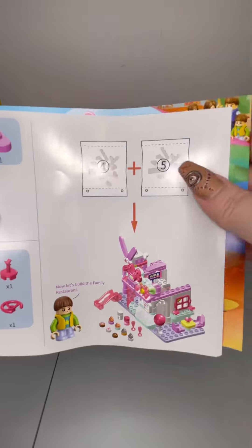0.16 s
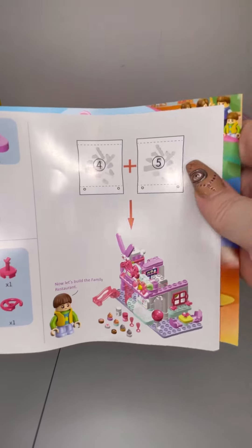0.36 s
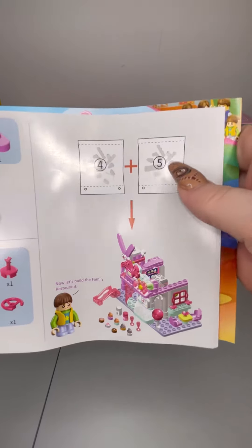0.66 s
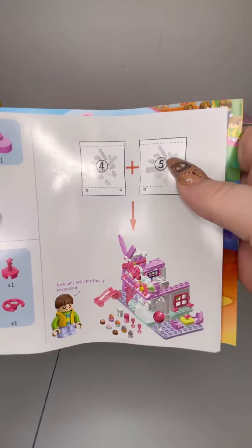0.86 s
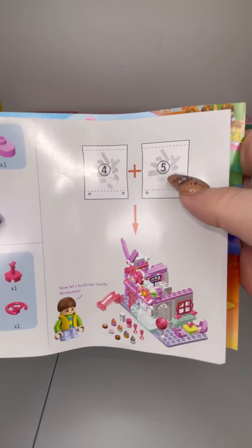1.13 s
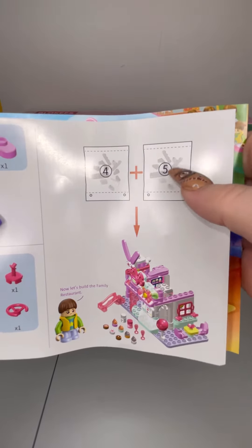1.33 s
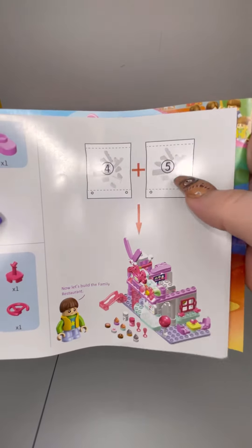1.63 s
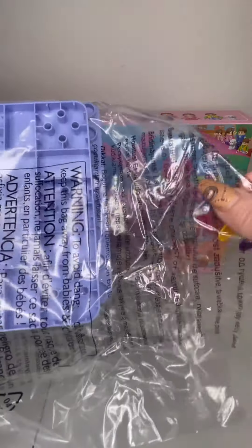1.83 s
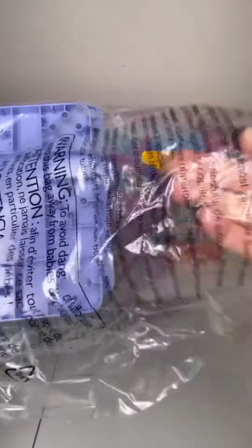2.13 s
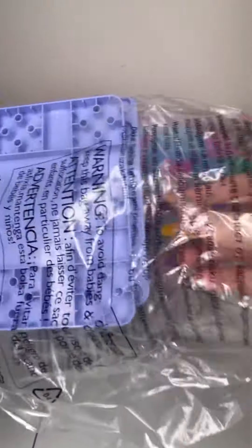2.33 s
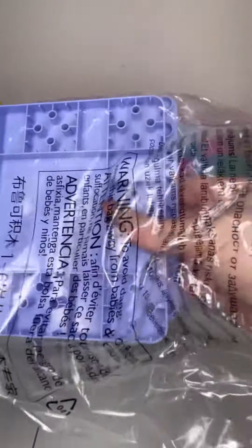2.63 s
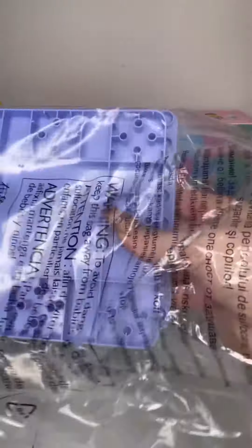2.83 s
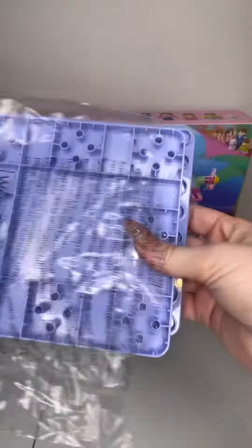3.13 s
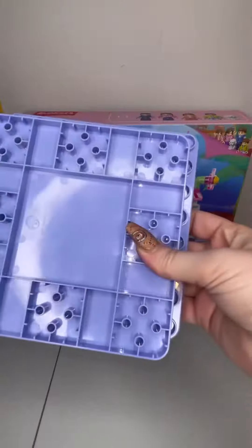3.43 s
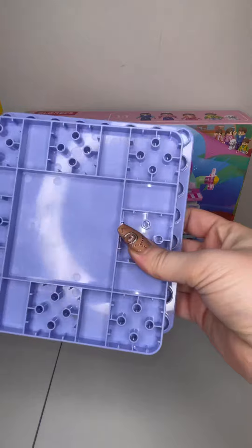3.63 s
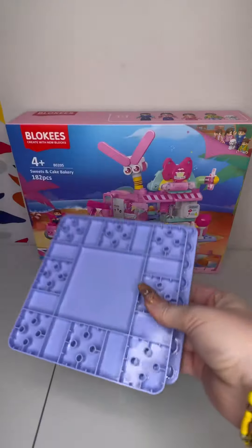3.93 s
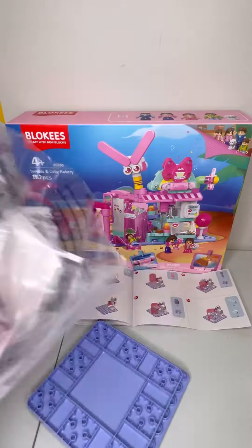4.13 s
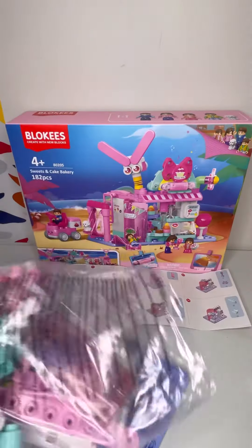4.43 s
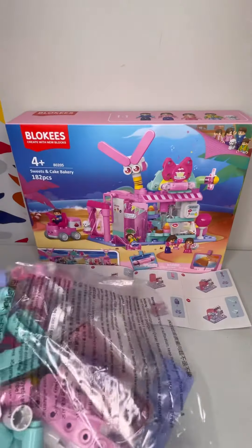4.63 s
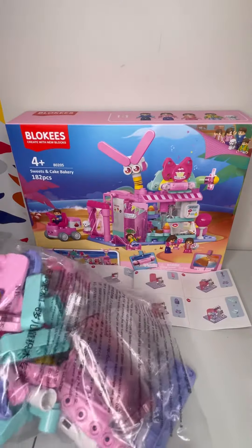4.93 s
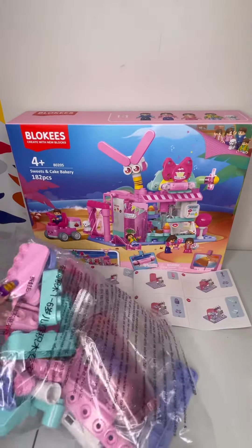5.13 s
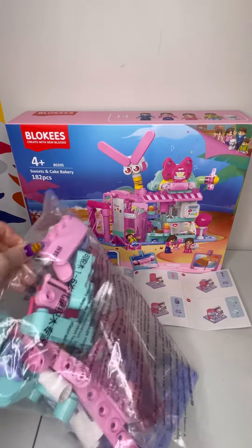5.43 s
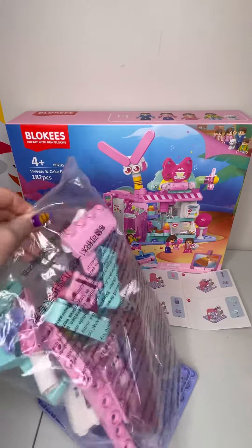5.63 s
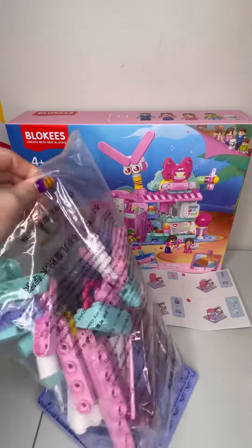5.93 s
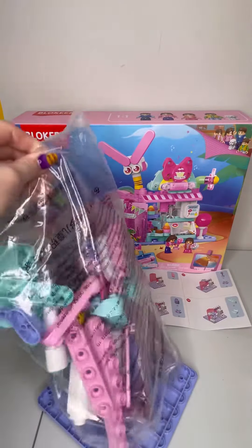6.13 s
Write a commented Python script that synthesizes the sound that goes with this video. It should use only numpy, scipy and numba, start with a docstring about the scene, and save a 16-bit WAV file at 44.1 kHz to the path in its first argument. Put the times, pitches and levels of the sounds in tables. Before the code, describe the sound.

Dry nail ticks on paper give way to crackling plastic film, near quiet, then a loud burst of toy blocks knocking inside a crinkly bag.

```python
"""A small room, close to a phone on a table: a fingernail taps a booklet, a plastic base plate is drawn out of its
crinkling bag, then a bag full of plastic building blocks is lifted and they clatter. Taps, folds, blocks and
table top are struck modes that ring and decay; sliding film, page swishes, bumps and the low hum of the room
are shaped noise. The walls answer everything near with a diffuse tail."""
import sys
import numpy as np
from scipy import signal
from scipy.fft import rfft, irfft
from scipy.io import wavfile
from scipy.ndimage import uniform_filter1d
from numba import njit

SR = 44100
rng = np.random.default_rng(int(sys.argv[2]) if len(sys.argv) > 2 else 0)


def makeup_ratio(level_db):
    """Linear amplitude ratio for a level in decibels (20 dB per factor of ten)."""
    decades = np.asarray(level_db, float) / 20
    return 10 ** decades


def transcribe(u):
    """Save the signal u as a 16-bit wav file named by the first command-line argument.

    u: samples, shape (n,) or (channels, n), limited to [-1, 1]; the rate is SR.
    q: integer samples, one column per channel.
    """
    v = np.clip(np.atleast_2d(u).T, -1, 1)
    q = np.round(v * 32767).astype(np.int16)
    wavfile.write(sys.argv[1], SR, q)


N = 276948  # length in samples

# Nail on booklet. Each row: start in seconds, level in dB.
TAP_TIMES = [(0.439, -48), (0.49, -52), (0.726, -47), (0.921, -40.5), (1.097, -40), (1.261, -41.5),
             (1.402, -40.5), (1.563, -34.5), (1.684, -51.5)]
# Crunches of film and blocks. Each row: start in seconds, level in dB for a short crunch, extra below 2500 Hz in dB,
# extra above 8000 Hz in dB, length in ms.
CRUNCHES = [(1.788, -47.5, 4.5, 0, 17.5), (1.811, -36.5, 2, 14.5, 4.1), (1.83, -35.5, -14.5, 9.5, 3.4),
            (1.891, -42.5, 8, -18, 5.8), (1.946, -38.5, 0, -16, 8.4), (1.97, -35.5, -21, 1, 7),
            (1.988, -33, -4, -4, 10.3), (2.026, -27, -14.5, 2.5, 5.4), (2.052, -41.5, 6, 23, 4.1),
            (2.109, -33, 0.5, 8, 13), (2.123, -31, -4.5, 8.5, 7.7), (2.226, -47.5, 9.5, 15.5, 10.7),
            (2.335, -43.5, 4.5, 11.5, 6.3), (2.442, -42, 9.5, -31.5, 5.2), (2.478, -25, -3.5, 7.5, 6.4),
            (2.51, -40.5, -18.5, 7.5, 25), (2.536, -28, -2, 4.5, 5.1), (2.633, -27, -6, 10, 5.5),
            (2.657, -28.5, -5.5, -3.5, 6.5), (2.716, -27, -5, -12, 7), (2.761, -30, -28, 6.5, 4.75),
            (2.811, -32, -4, 6, 8.5), (2.823, -23, -6.5, -3, 6.2), (2.842, -30, 0, 8, 8.6),
            (2.882, -36.5, 7, 1, 8.5), (2.99, -33.5, -13, 8, 6.3), (3.007, -34.5, -3, -18, 6.6),
            (3.045, -40, -12, -2.7, 9.4), (3.158, -29.5, -8, 0.5, 3.6), (3.244, -43, 5.5, 9.5, 7.4),
            (3.344, -40.5, 4, 13, 5.2), (3.399, -33.5, -6, -14, 7), (3.439, -31, -36, 3, 4.66),
            (3.792, -39.5, -7.5, 0, 4), (3.9985, -60, -5, -6, 2), (4.022, -54, 4.5, -20, 3),
            (4.09, -38.5, -0.5, 5.5, 6.2), (4.129, -42.5, 1.5, 17, 6.7), (4.194, -41, -1, -5.5, 6),
            (4.216, -27.5, -6, 3.5, 11.3), (4.267, -32.5, 1, 8, 6.9), (4.29, -25.5, -4.5, 1.5, 6),
            (4.372, -20, -7.5, 10.5, 5.9), (4.376, -15, -12.5, 4, 6.7), (4.384, -16.5, -36.5, -10, 5.2),
            (4.679, -39.5, -2, -3, 15.1), (4.741, -38, -8, 8.5, 7.6), (4.788, -31.5, -11.5, 5.5, 5.3),
            (4.813, -41.5, 0, 10.5, 8.5), (4.866, -41.5, 7.5, 15, 16.3), (4.989, -35.5, -6, 6, 13.3),
            (5.039, -35, -15, 8, 16), (5.137, -31.5, -10, 2.5, 8.8), (5.191, -33, -9.5, 10, 3.5),
            (5.252, -33, -20, 16, 2.7), (5.481, -24, -9, 6, 7.7), (5.557, -38, -10, -13, 21),
            (5.696, -31, -6, 4, 23.6), (5.717, -32.5, -3, -6, 36), (5.773, -29, -9, 0.5, 21),
            (5.807, -21.5, -18, 1.5, 16.8), (6.029, -31.5, -8, 1, 12), (6.12, -31.5, -6.5, -15, 26),
            (6.248, -28.5, -15, 4, 11)]
# Colour of the plastic film. Each row: frequency in Hz, relative level in dB.
FILM_COLOUR = [(300, -24.5), (600, -8.5), (920, -11), (1250, 0.5), (1700, -3), (2500, -2.5), (5000, 2),
               (7500, -5), (10000, -2.5), (11500, 5), (12500, -38)]
# Phase scatter between the two microphone ports. Each row: frequency in Hz, scatter in radians.
PORT_SCATTER = [(60, 0.47), (250, 0.96), (700, 3.2), (1300, 1.96), (3000, 4.46), (6500, 0.73),
                (8500, 0.076), (13000, 0.11)]


def curve(rows):
    """Columns of a table, joined by straight lines in time."""
    s, *columns = np.transpose(rows)
    return [np.interp(np.arange(N) / SR, s, c) for c in columns]


def spectrum(points, hz):
    """Straight lines between points on a log-frequency axis."""
    at, value = np.transpose(points)
    return np.interp(np.log(np.maximum(hz, 1)), np.log(at), value)


def split(x, order, hz):
    """The parts below and above a frequency, without delay; they add up to the whole."""
    below = signal.sosfiltfilt(signal.butter(order, hz, fs=SR, output="sos"), x)
    return below, x - below


def noise(points, size=N):
    """Stereo noise of rms 1; the ports agree as far as their phase scatter allows."""
    hz = np.fft.rfftfreq(size, 1 / SR)
    alike = np.exp(-spectrum(PORT_SCATTER, hz) ** 2 / 2)
    mid, side = rfft(rng.standard_normal((2, size))) * makeup_ratio(spectrum(points, hz))
    opposed = side * np.array([[1], [-1]])
    x = irfft(np.sqrt(1 + alike) * mid + np.sqrt(1 - alike) * opposed, size)
    return x / np.sqrt(np.mean(x ** 2))


def walk(rate):
    """Random levels held 1 / rate s and slewed twice; spread near 1."""
    k = int(SR / rate)
    held = np.repeat(rng.standard_normal(N // k + 1), k)
    return 1.3 * uniform_filter1d(uniform_filter1d(held, k), k)[:N]


@njit
def rings(start, pole, left, right, size):
    """Each ring is a decaying sine that runs until it is 50 dB down."""
    out = np.zeros((2, size))
    for k in range(len(start)):
        z = 1 + 0j
        for i in range(start[k], size):
            out[0, i] += (left[k] * z).imag
            out[1, i] += (right[k] * z).imag
            z *= pole[k]
            if abs(z.real) + abs(z.imag) < .003:
                break
    return out


def strike(s, hz, db, t60, chance):
    """Struck modes ring and decay; each reaches the two ports with its own phase."""
    decay = np.log(1000) / (np.maximum(t60, 1e-3) * SR)
    pole = np.exp(2j * np.pi * np.minimum(hz, .45 * SR) / SR - decay)
    turn = np.exp(.5j * spectrum(PORT_SCATTER, hz) * chance)
    start = (s * SR + 0 * hz).astype(np.int64)
    left, right = makeup_ratio(db) * turn, makeup_ratio(db) / turn
    return rings(start.ravel(), pole.ravel(), left.ravel(), right.ravel(), N)


def blows(s, db, modes, spread=1, late=0):
    """Blows on one body: the same modes, a little different each time; slow modes may set in late (cycles)."""
    hz, mode_db, t60 = np.transpose(modes)
    chance = rng.standard_normal((len(s), 3, len(modes)))
    db = db + mode_db + 1.5 * chance[:, 1]
    return strike(s + late / hz, hz * (1 + 0.015 * chance[:, 0]), db, t60 + 0 * s, spread * chance[:, 2])


def crack(s, db, body_db, edge_db, length_s, count, uneven_db=1.5, hump_db=2.5):
    """A buckling fold of film or a knock: a run of short rings over the whole range, thinning out with time."""
    rise_s = .0014  # a fold takes this long to give way
    place, chance = rng.random((len(s), 2, count)), rng.standard_normal((len(s), 2, count))
    hz = 290 * 50 ** ((np.arange(count) + place[:, 0]) / count)
    tilt_db = np.where(hz < 2500, body_db, np.where(hz > 8000, edge_db, 0))
    colour_db = spectrum(FILM_COLOUR, hz) + tilt_db
    # every fold favours its own part of the range
    colour_db = colour_db + hump_db * np.cos(2 * np.log(hz) + 2 * np.pi * rng.random((len(s), 1)))
    # small stiff areas of plastic die within a few cycles
    t60 = 5.5 / hz + .002
    # short cracks give most at once, long crunches stay even
    delay = length_s * place[:, 1] ** (1 + .016 / length_s)
    delay = delay + rise_s * place[:, 0]
    colour_db = colour_db + 10 * np.log10(1 - np.exp(-delay / rise_s))
    return strike(s + delay, hz, db + colour_db + uneven_db * chance[:, 0], t60, chance[:, 1])


def room_tone():
    """The room hums low: steady noise, strongest near 61 Hz, its level wandering a little."""
    # Colour of the hum. Each row: frequency in Hz, relative level in dB.
    hum_colour = [(25, -1.5), (40, 2.5), (61, 11.5), (85, 2), (118, 0), (160, -12), (250, -33),
                  (315, -15.5), (420, -33.5), (700, -22), (1050, -41.5), (1700, -27), (5000, -62),
                  (13000, -57)]
    return makeup_ratio(-54.5 + 1.7 * walk(5.5)) * noise(hum_colour)


def room(x):
    """Diffuse answer of the walls: it builds up as the reflections arrive, then dies away, the treble sooner."""
    t60_s, treble_t60_s, rise_s, level_db = 0.27, 0.31, 0.0054, -6.5
    size = SR // 2
    t = np.arange(size) / SR
    dull, bright = split(noise([(100, 11.0), (1000, 3.9), (13000, 1.1)], size=size), 2, 6000)
    # the treble decays by both rates together
    tail = (dull + bright * makeup_ratio(-60 * t / treble_t60_s)) * makeup_ratio(-60 * t / t60_s)
    tail = tail * (1 - np.exp(-(t / rise_s) ** 2))
    tail = tail / np.sqrt(np.sum(tail ** 2) / 2)
    return makeup_ratio(level_db) * signal.fftconvolve(x.mean(axis=0)[None], tail, axes=1)[:, :N]


def bumping():
    """Hands and bag knock the table and push air at the ports: low noise that swells and fades."""
    # Low bumping. Each row: time in seconds, level in dB around which it wanders.
    bump_levels = [(0.0, -69.5), (1.764, -71), (1.79, -51), (2.13, -43.5), (2.29, -55), (2.45, -45),
                   (3.77, -72.5), (4.5, -39), (4.63, -53), (6.28, -45.5)]
    # Its colour. Each row: frequency in Hz, relative level in dB.
    bump_colour = [(25, -31), (60, 2.5), (130, 1.5), (250, -1.5), (500, -17), (900, -48.5)]
    return makeup_ratio(curve(bump_levels)[0] + 2.4 * walk(30)) * noise(bump_colour)


def thuds():
    """The table top rings low under heavier blows and, more softly, under each tap."""
    # Blows on the table top. Each row: start in seconds, level in dB.
    table_blows = [(1.807, -36), (1.997, -32), (2.111, -31.5), (2.469, -29), (2.875, -36.5), (4.437, -20.5),
                   (4.495, -28.5), (4.559, -32)]
    # Modes of the table top. Each row: frequency in Hz, relative level in dB, decay by 60 dB in seconds.
    table_modes = [(63.5, -1.5, 0.18), (133.3, -1.5, 0.18), (232, -5.5, 0.037)]
    heavy = blows(*np.transpose(table_blows)[:, :, None], table_modes, late=0.75)
    tap_s, tap_db = np.transpose(TAP_TIMES)[:, :, None]
    return heavy + blows(tap_s, tap_db - 6, table_modes[1:])  # taps leave out the lowest mode


def brushes():
    """A thumb brushes over the page: soft swishes of noise that swell and fade smoothly."""
    # Swishes. Each row: start in seconds, length in seconds, peak level in dB around which it wanders.
    swishes = [(0.099, 0.22, -66.5), (0.306, 0.095, -66.5), (0.518, 0.08, -62.5)]
    # Hiss of the page. Each row: frequency in Hz, relative level in dB.
    page_colour = [(500, 0.5), (1500, 4), (6000, -0.5), (9000, -4.5), (11500, 7.5), (13000, -36)]
    s, length_s, db = np.transpose(swishes)[:, :, None]
    along = np.clip((np.arange(N // 5) / SR - s) / length_s, 0, 1)
    swell = np.sum(makeup_ratio(db) * np.sin(np.pi * np.sqrt(along)), axis=0)
    return np.pad(swell, (0, N - len(swell))) * makeup_ratio(2 * walk(38.4)) * noise(page_colour)


def taps():
    """Every tap is a dry tick that also rings the same sheet modes; the sheets then shuffle briefly."""
    # Modes of the sheets. Each row: frequency in Hz, relative level in dB, decay by 60 dB in seconds.
    sheet_modes = [(300, -9, .02), (660, -12, .015), (1560, -18, .03), (2560, -6, .016), (2750, -6, .016),
                   (3700, -12, .012)]
    s, db = np.transpose(TAP_TIMES)[:, :, None]
    tick_s, wait_s, shuffle_s = .003, .004, .03
    tick_db, shuffle_db = -15, -17.5  # relative to the listed tap level
    sheets = blows(s, db, sheet_modes, spread=.25, late=1.2)
    tick = crack(s, db + tick_db, 0.5, 12.0, tick_s, count=50)
    shuffle = crack(s + wait_s, db + shuffle_db, -0.73, 0.99, shuffle_s, count=60)
    return sheets + tick + shuffle


def crackle(rate, scatter_db, most_db):
    """Many small cracks at random, a few of them much larger, each with its own colour; rms 1."""
    chance = rng.random((5000, 4))
    s = np.cumsum(-np.log(1 - chance[:, :1]), axis=0) / rate
    db = np.minimum(-scatter_db * np.log(1 - chance[:, 1:2]), most_db)
    body_db, edge_db = 16 * (chance[:, 2:3] - .5), 16 * (chance[:, 3:] - .5)
    x = crack(s, db, body_db, edge_db, length_s=.003, count=10, uneven_db=4., hump_db=6.)
    return x / np.sqrt(np.mean(x ** 2))


def tumbling(rate, t60):
    """Pieces tick against each other at random, each contact ringing one of their modes; rms 1."""
    # Rings of the hollow pieces: one frequency in Hz each, varied slightly at every contact.
    block_rings = [1090, 1280, 1585, 2080, 2734, 3570, 4120, 4800, 6130]
    count = 2000
    chance, normal = rng.random((count, 2)), rng.standard_normal((count, 3))
    s = np.cumsum(-np.log(1 - chance[:, 0])) / rate
    piece = (chance[:, 1] * len(block_rings)).astype(int)
    hz = np.array(block_rings)[piece] * (1 + 0.022 * normal[:, 0])
    x = strike(s, hz, 4.5 * np.minimum(normal[:, 1], 2), t60 + 0 * hz, normal[:, 2])
    return x / np.sqrt(np.mean(x ** 2))


def settling(db):
    """Power of the stir each crunch leaves as film springs back and pieces settle: it swells, then dies away."""
    rise_s, t60_s = 0.0043, 0.14
    s, length_ms = np.transpose(CRUNCHES)[[0, 4], :, None]
    step = 64  # samples between computed points
    since = np.maximum(np.arange(0, N, step) / SR - s, 0)
    after = np.maximum(since - length_ms / 1000, 0)
    power = (makeup_ratio(db[:, None] - 60 * after / t60_s) * (1 - np.exp(-since / rise_s))) ** 2
    return np.interp(np.arange(N), np.arange(0, N, step), power.sum(axis=0))


def rustle():
    """Film slides and crackles while plastic pieces tumble inside it."""
    # How busily the hands move page and bags. Each row: time in seconds, gain of the bright rustle in dB,
    # gain of the dull clatter in dB.
    hand_levels = [(0, -70, -60.5), (1.783, -77, -66), (1.795, -42, -45), (1.9, -70, -53.5),
                   (2.03, -38, -31.5), (2.2, -74, -57), (2.24, -37, -49), (2.32, -48.5, -57),
                   (2.9, -44.5, -39), (3.43, -53.5, -60.5), (3.55, -80, -83.5), (4.045, -77.5, -62.5),
                   (4.085, -52, -47.5), (4.4, -26.5, -28), (4.55, -37, -33), (4.61, -52, -49.5),
                   (4.72, -45, -45), (4.8, -32, -33.5), (4.91, -41.5, -43), (5.02, -33.5, -33.5),
                   (5.11, -42.5, -43), (5.22, -36, -36.5), (5.36, -42, -40.5), (5.455, -44.5, -45),
                   (5.5, -32.5, -35.5), (5.98, -36, -36.5), (6.28, -28, -30)]
    bright_db, dull_db = curve(hand_levels)
    db, body_db = np.transpose(CRUNCHES)[1:3]
    # the stir after each crunch adds to the hands in power
    bright_gain = np.sqrt(makeup_ratio(bright_db) ** 2 + settling(db - 8.5))
    dull_gain = np.sqrt(makeup_ratio(dull_db) ** 2 + settling(db + body_db - 6.5))
    crackling = crackle(rate=760, scatter_db=5, most_db=9)
    ticking = tumbling(rate=300, t60=.016)
    # one plate at first, many blocks in the second bag
    pieces_db = np.where(np.arange(N) < 4 * SR, -11., -5.)
    # before the first bag only the page hisses faintly
    bag_moves = np.arange(N) > 1.78 * SR
    grains = bag_moves * (crackling + makeup_ratio(pieces_db) * ticking)
    hiss = makeup_ratio(-10 + 2 * walk(90)) * noise(FILM_COLOUR)
    # unsteady grip
    busy = (grains + hiss) * makeup_ratio(2 * walk(25))
    dull, bright = split(busy, 2, 2500)
    return bright_gain * bright + dull_gain * dull


def snaps():
    """A taut fold pops through at once: a tight cluster of rings, gone in a few cycles."""
    # Pops. Each row: start in seconds, level in dB (every ring starts 0.5 dB below it), centre of the cluster in Hz.
    pops = [(1.8924, -26.5, 4060), (1.989, -18, 5660), (2.029, -21.5, 4600), (2.126, -14.5, 6130),
            (2.338, -32, 4830), (2.444, -27.5, 3800), (2.4799, -9, 5460), (2.635, -23, 6030),
            (2.668, -27, 3020), (2.676, -25, 1900), (2.769, -23, 3860), (2.8261, -18.5, 4600),
            (3.008, -29.5, 3630), (3.794, -47, 1050), (4.053, -37.5, 1520), (4.065, -41, 1700),
            (4.074, -39.5, 2300), (4.111, -29.5, 5560), (4.813, -23.5, 5700), (5.022, -26, 3000),
            (5.4603, -27, 1610), (5.483, -37, 4840), (6.0, -27.5, 2710), (6.203, -23, 5000),
            (6.263, -11.5, 6230)]
    s, db, hz = np.transpose(pops)[:, :, None]
    chance = rng.standard_normal((len(s), 3, 4))
    hz = hz * (1 + 0.058 * chance[:, 0])
    return strike(s + 0.00029 * np.abs(chance[:, 1]), hz, db - 0.5, 14 / hz, 0.56 * chance[:, 2])


def cracks():
    """The loud crunches: the longer one lasts, the more it must give to hold its level."""
    s, db, body_db, edge_db, length_ms = np.transpose(CRUNCHES)[:, :, None]
    # a crunch of 3.15 ms plays at its listed level
    db = db + 10 * np.log10(length_ms / 3.15)
    return crack(s, db, body_db, edge_db, length_ms / 1000, count=90)


def knocks():
    """Each hollow block rings at two pitches and rattles a second and third time."""
    # Knocks. Each row: start in seconds, level in dB, low ring in Hz, high ring in Hz, both varied slightly.
    block_knocks = [(2.487, -24, 1280, 1533), (4.381, -11.5, 2053, 4800), (4.866, -25, 744, 2070),
                    (5.016, -32, 1340, 4300), (5.042, -31, 1280, 2280), (6.138, -26, 1240, 1530),
                    (5.717, -24, 1330, 4240), (5.807, -20.5, 3570, 4770), (5.947, -22, 1090, 2135),
                    (6.029, -27.5, 1375, 5660)]
    gap_s, drop_db = 0.0061, 2  # from one bounce to the next
    s, db, low_hz, high_hz = np.transpose(block_knocks)[:, :, None]
    hz = np.hstack([low_hz, high_hz] * 3)
    bounce, chance = np.arange(6) // 2, rng.standard_normal((len(s), 2, 6))
    hz = hz * (1 + 0.022 * chance[:, 0])
    return strike(s + gap_s * bounce, hz, db - drop_db * bounce, 0.026 + 0 * hz, chance[:, 1])


def scene():
    """Everything close by with the room's answer, over the low sounds of table and room."""
    # Where the hands are. Each row: time in seconds, left minus right in dB.
    hand_side = [(0, 5), (2.3, 3.5), (3.8, 0.8), (6.28, 0.2)]
    pan_db, tapped = curve(hand_side)[0], taps()
    near = tapped + brushes() + cracks() + snaps() + knocks() + rustle()
    # everything close by is kept above 250 Hz
    near = signal.sosfilt(signal.butter(4, 250, "highpass", fs=SR, output="sos"), near)
    # the taps sound drier: 4 dB less of them goes to the room
    near = near + room(near - (1 - makeup_ratio(-4)) * tapped)
    # the top treble reaches both ports alike
    below, treble = split(near, 4, 7000)
    near = treble + below * makeup_ratio(np.array([pan_db, -pan_db]) / 2)
    low = thuds() + bumping() + room_tone()
    low_pan_db = -1.5  # left minus right
    return near + low * makeup_ratio(low_pan_db / 2 * np.array([[1], [-1]]))


def low_pass(x):
    """Removes everything above the highest recorded frequency."""
    return signal.sosfilt(signal.butter(12, 12870, fs=SR, output="sos"), x)


def record(dry):
    """The phone's microphones limit the range; one port's cavity turns its phase a full circle at resonance."""
    low_hz, top_hz, port_hz, port_width_hz = 41.7, 12300, 10160, 2370
    dry = signal.sosfilt(signal.butter(3, low_hz, "highpass", fs=SR, output="sos"), dry)
    dry = signal.sosfilt(signal.butter(10, top_hz, fs=SR, output="sos"), dry)
    r, c = np.exp(-np.pi * port_width_hz / SR), np.cos(2 * np.pi * port_hz / SR)
    left = signal.lfilter([r * r, -2 * r * c, 1], [1, -2 * r * c, r * r], dry[0])
    return low_pass(np.array([left, dry[1]]))


dry = scene()
out = record(dry)
transcribe(out)
```